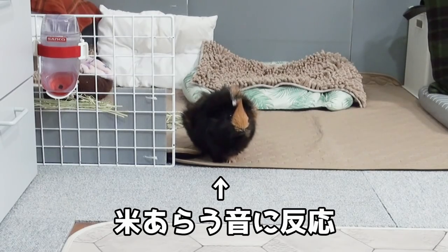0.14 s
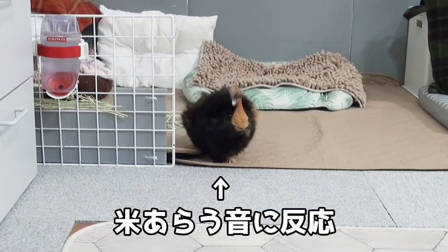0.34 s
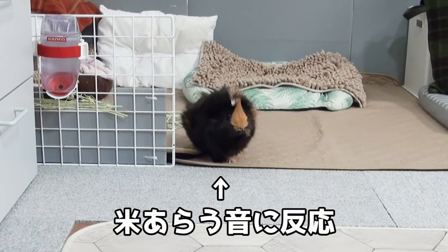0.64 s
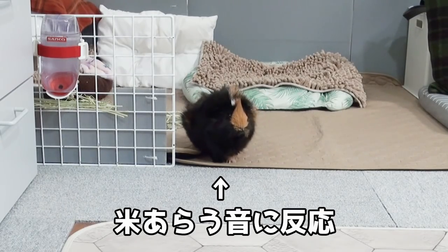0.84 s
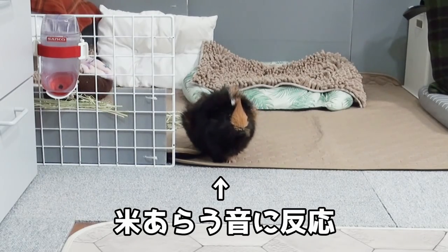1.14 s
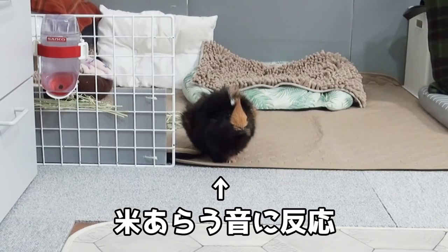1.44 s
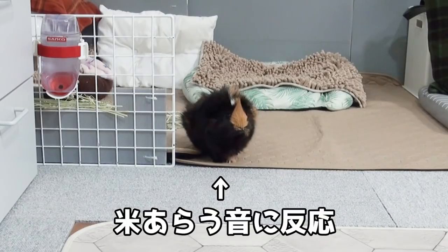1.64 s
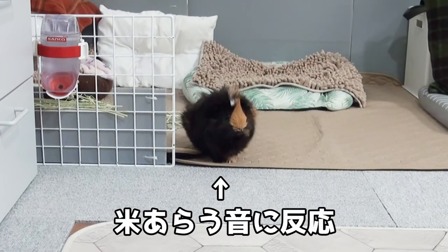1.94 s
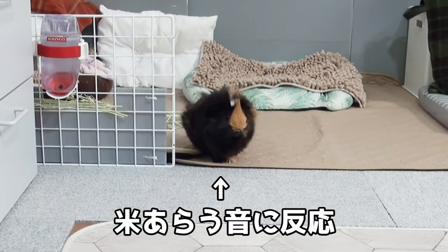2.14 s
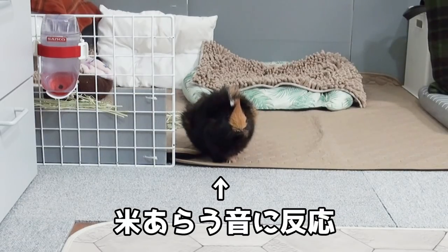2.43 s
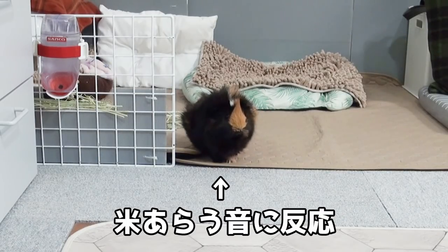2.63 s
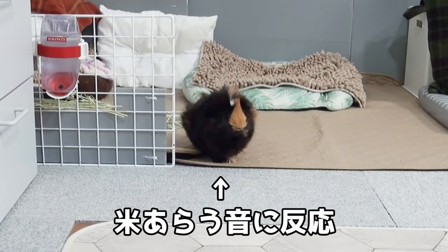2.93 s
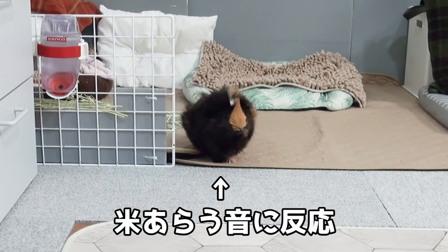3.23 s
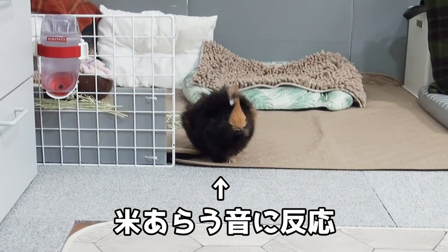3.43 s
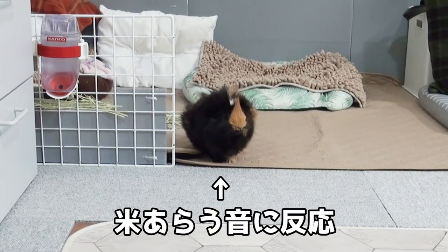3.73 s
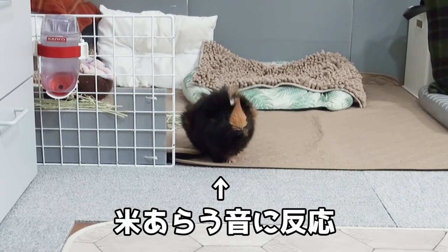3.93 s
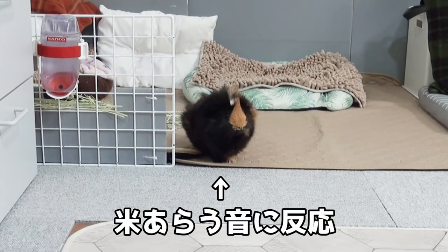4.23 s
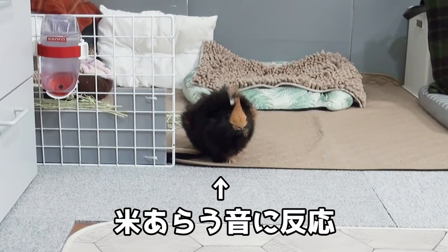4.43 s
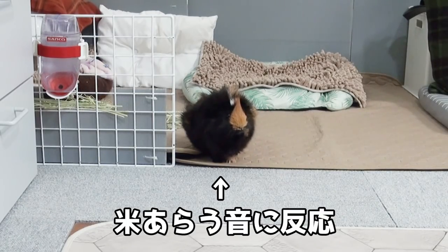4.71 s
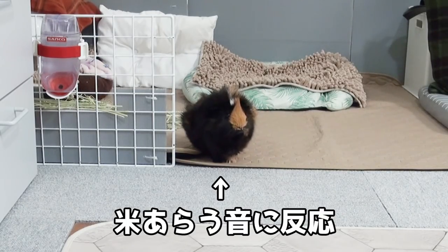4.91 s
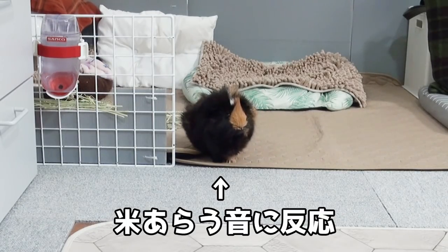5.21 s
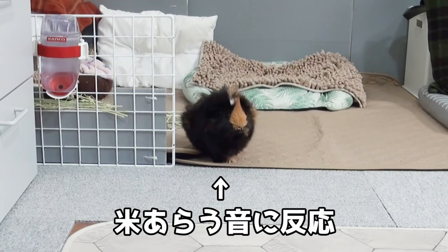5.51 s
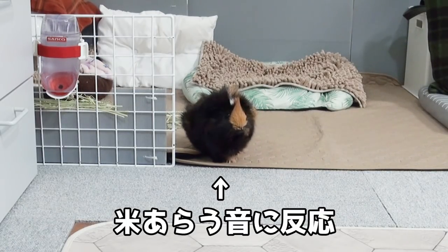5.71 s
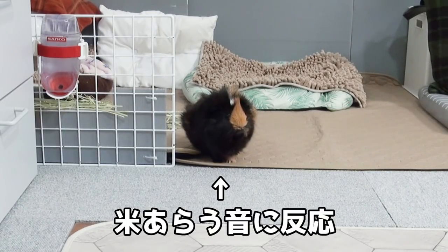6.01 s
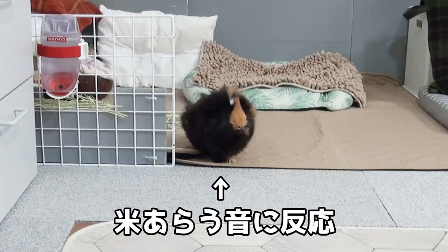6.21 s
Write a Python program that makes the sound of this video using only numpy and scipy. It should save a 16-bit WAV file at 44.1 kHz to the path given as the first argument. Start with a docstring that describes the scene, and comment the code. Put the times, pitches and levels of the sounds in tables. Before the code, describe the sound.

A hand swishes wet rice round a metal bowl about three strokes a second, grains rattling brightly while water gulps and bubbles between strokes.

```python
"""Washing rice in a metal bowl

A hand swirls rice in water, about three strokes a second, heard from across a kitchen.
Random ticks make the rattling grains, and short decaying tones make the bubbles.
Wavering, gliding tones make air pockets gulp and gurgle; filtered noise makes the low water.
The metal bowl rings and the room adds a short tail.
Two wavering low tones make a faint, fuzzy resonance stirred by the hand.
"""
import sys
import numpy as np
from scipy import signal
from scipy.fft import rfft, irfft
from scipy.io import wavfile
from scipy.ndimage import uniform_filter1d

SR = 44100
rng = np.random.default_rng(int(sys.argv[2]) if len(sys.argv) > 2 else 0)


def file_out(sig):
    """Save sig as 16-bit WAV at sys.argv[1]."""
    # one column per channel
    cols = np.atleast_2d(sig).T
    # limit, then scale
    lim = np.clip(cols, -1, 1)
    pcm = np.round(lim * 32767).astype(np.int16)
    wavfile.write(sys.argv[1], SR, pcm)


N = 280476
TIME = np.arange(N) / SR  # seconds
HZ = np.fft.rfftfreq(N, 1 / SR)

# Levels in the tables are starting points: the functions may trim them, and the bowl colours them.
# Colour tables only set the balance between pitches.

# Strokes of the hand, each lasting until the next starts: start_s, speeding_up_s, slowing_down_s,
# fade_across_db, rattle_level_db, wet_crunch_level_db, metal_scratch_level_db
HAND_STROKES = [(-0.027, 0.055, 0.13, 2.5, -36.5, -46.5, -43.5), (0.199, 0.13, 0.14, -7, -34, -45.5, -41),
                (0.528, 0.064, 0.14, -4.5, -37, -45, -45), (0.849, 0.062, 0.3, -12.5, -34.5, -38.5, -43),
                (1.201, 0.056, 0.1, -0.5, -37, -43, -48), (1.5, 0.073, 0.35, -9.5, -32.5, -36.5, -38),
                (1.824, 0.11, 0.033, 11.5, -34.5, -39.5, -41.5), (2.155, 0.16, 0.41, 5, -31, -31, -32.5),
                (2.518, 0.089, 0.049, 7, -38.5, -39.5, -44.5), (2.833, 0.1, 0.2, -1, -32.5, -36, -37.5),
                (3.17, 0.077, 0.24, -12.5, -34, -39.0, -39), (3.49, 0.095, 0.29, -4, -33.5, -34.5, -38.5),
                (3.861, 0.07, 0.32, -15, -36.5, -37, -40), (4.193, 0.062, 0.34, -4, -31.5, -33, -37),
                (4.502, 0.096, 0.28, 12, -35.5, -40, -39), (4.897, 0.25, 0.22, 24, -31.5, -32.5, -35.5),
                (5.188, 0.048, 0.23, -7.5, -34.5, -41, -40.5),
                (5.513, 0.044, 0.041, 17.5, -38.5, -43, -48.5), (5.808, 0.12, 0.31, -15, -29.5, -29.5, -37),
                (6.063, 0.097, 0.21, -25.5, -34.5, -37, -44)]
# Brief surges and dips in the grain sound: middle_s, half_length_s, rattle_lift_db, crunch_lift_db
GRAIN_SURGES = [(.53,0.02,2.5,2),(0.922,0.0064,4,-2),(0.96,0.021,2,-3),(1.196,.015,-0.5,2),(1.25,0.025,3,0),(1.276,0.007,-1.5,6),(1.315,0.016,-6.5,-2),(1.412,0.013,-9,3.5),(1.445,0.0067,-3,-5),(1.695,0.023,1,3.5),(1.804,0.011,0,-8),(2.041,0.012,-0.5,5),(2.203,0.029,-4,4),(2.283,0.03,4.5,-2),(2.372,0.025,1,6.5),(2.47,0.016,4.5,-2),(2.518,0.024,-3.5,-6),(2.66,0.01,1,-3),(2.71,0.012,-8,2),(2.803,0.016,9.5,2.5),(2.96,0.0092,3.5,2),(2.985,0.011,-1.5,-3.5),(3.067,0.017,3.5,5.5),(3.202,0.015,-2,3.5),(3.265,0.007,1,5),(3.387,0.017,1.5,9),(3.48,0.011,2.5,-8),(3.825,0.018,4,-7),(3.607,0.046,4,-0.5),(3.723,0.02,-2.5,4),(3.957,0.02,6.5,2.5),(4.07,0.018,2.5,5.5),(4.122,0.032,4,-1.5),(4.39,0.018,4.5,4.5),(4.569,0.0089,-4,5.5),(4.692,0.038,1,7.5),(4.796,0.016,6.5,4.5),(5.016,0.014,-0.5,3.5),(5.069,0.0084,-7,2.5),(5.236,.006,-3,9),(5.267,0.0044,1,5),(5.356,0.023,4.5,7.5),(5.455,0.0082,3,5.5),(5.695,0.0083,5.5,2.5),(6.058,.02,2,-1.5),(6.345,.02,-1,0)]
# Clumps of rice that break loose all at once: start_s, level_db, decay_s
BREAKING_CLUMPS = [(0.909, -39, 0.007), (1.036, -32, .008), (1.346, -46, 0.011), (1.559, -37, .012),
                   (1.87, -34, .012), (2.207, -31, 0.014), (2.563, -38, .02), (3.246, -33, 0.01),
                   (3.544, -32.5, .012), (3.931, -33, 0.011), (4.038, -32, .006), (4.229, -34, .012),
                   (4.265, -31, .006), (5.538, -36, .015), (6.16, -41, .012)]
# Colour of the rattling grains: pitch_hz, level_db_per_hz
RATTLE_COLOUR = [(300, -85), (900, -56), (2000, -19), (3200, -11.5), (4000, -1.5), (5000, 2), (6300, -3.5),
                 (7300, -2.5), (8000, -11.5), (9000, -17), (11000, -56), (14000, -75)]
# Colour of the wet crunch: pitch_hz, level_db_per_hz
CRUNCH_COLOUR = [(200, -87), (700, -50), (1100, -34.5), (1450, -11), (1700, -9), (2100, -6.5), (2350, -1.5),
                 (2650, -0.5), (3100, -1.5), (3800, -3.5), (5000, -10.5), (9000, -45), (14000, -85)]
# Colour of the scratch on the metal: pitch_hz, level_db_per_hz
SCRATCH_COLOUR = [(1000, -80), (4500, -33), (6300, 2), (7300, 0.5), (7900, -0.5), (8700, -0.5),
                  (9500, -10.5), (10300, -12), (11000, -31), (12500, -37), (15000, -81)]
# Colour of a breaking clump: pitch_hz, level_db_per_hz
CLUMP_COLOUR = [(300, -48), (1000, -19), (1800, -3), (2600, 1), (5000, 5), (7300, -10), (9000, -18),
                (11000, -44), (15000, -65)]
# Swarms of bubbles in the wake of the hand: middle_s, half_length_s, level_db, pitch_hz, scatter_octaves
BUBBLE_SWARMS = [(0.182,0.11,-54,1216,0.51),(0.434,0.11,-50,1252,0.47),(0.766,0.047,-46.5,1350,0.57),(0.913,0.038,-46.5,1250,0.42),(1.064,0.07,-42.5,1136,0.71),(1.277,0.052,-48.5,1360,0.44),(1.378,0.057,-42.5,1184,0.33),(1.537,0.036,-43.5,1230,0.49),(1.702,0.066,-44.5,1350,0.65),(2.025,0.056,-45.5,1374,0.39),(2.218,0.09,-43.5,1440,0.35),(2.392,0.041,-42.5,1415,0.62),(2.617,0.07,-43.5,1477,0.41),(2.754,0.054,-54,1370,0.79),(3.055,0.065,-45.5,1380,0.35),(3.29,0.079,-45,1455,0.35),(3.583,0.061,-55,1440,0.31),(3.75,0.05,-59,1450,0.29),(4.02,0.18,-55,1494,0.22),(4.23,0.052,-49,1377,0.23),(4.357,0.044,-48.5,1540,0.31),(4.514,0.062,-48.5,1377,0.37),(4.61,0.028,-55,1360,0.26),(4.707,0.033,-58,1410,0.294),(5.04,0.03,-63,1470,0.51),(5.226,0.021,-52,1466,0.47),(5.395,0.024,-56,1244,0.22),(5.483,0.01,-47.5,1150,0.38),(5.544,0.031,-44.5,1296,0.57),(5.815,0.05,-45.5,1232,.36),(6.157,0.045,-48,1360,0.47)]
# Small bubbles give off little bass: pitch_hz, level_db
SWARM_COLOUR = [(200, -28), (600, -4), (1000, -1), (1600, -1.5), (4000, 27)]
# Waves that cross the bowl: middle_s, half_length_s, rocking_level_db, rumble_level_db
BOWL_WAVES = [(0.054,0.066,-47,-86),(0.192,0.035,-48.5,-80),(0.443,0.071,-55.5,-75),(0.795,0.053,-44.5,-73),(1.073,0.049,-51,-84),(1.176,0.017,-57,-77),(1.42,.048,-50,-75),(1.71,0.053,-51,-88),(1.98,0.028,-53.5,-82),(2.105,0.052,-49.5,-82),(2.28,0.054,-54,-92),(2.45,0.015,-58,-99),(2.55,0.08,-55,-96),(2.673,0.053,-59,-75),(2.768,0.058,-50.5,-80),(3.208,0.05,-52,-74),(3.36,0.041,-59,-81),(3.47,0.028,-57.5,-84),(3.781,0.035,-55,-79),(3.878,0.03,-50,-77),(4,0.058,-54.5,-83),(4.13,0.03,-57,-91),(4.365,0.079,-59,-87),(4.47,0.028,-56,-77),(4.586,0.031,-63,-93),(4.795,0.018,-64.5,-87),(5.058,0.033,-58.5,-74),(5.16,0.11,-66,-98),(5.627,0.078,-63,-79),(5.782,0.026,-52.5,-75),(6.276,0.062,-53,-89)]
# Level of the water under the waves: time_s, rocking_level_db, rumble_level_db
WATER_FLOOR = [(0,-69,-75),(.6,-82,-80.5),(1,-69,-89),(2,-72,-82),(2.8,-72,-95),(3.03,-91,-99),(3.2,-76,-85),(3.67,-80,-92),(3.9,-73,-100),(4.5,-62.5,-88),(4.87,-99,-102),(5.05,-76,-92),(5.4,-92,-88),(5.6,-78,-88),(6.36,-69,-82)]
# Colour of the rocking water: pitch_hz, level_db_per_hz
ROCKING_COLOUR = [(250, -29), (400, -19), (470, -8.5), (530, -5), (620, 8.5), (740, 2.5), (860, -5.5),
                  (1200, -3.5), (2500, -62), (9000, -80)]
# Colour of the dull rumble of the water: pitch_hz, level_db_per_hz
RUMBLE_COLOUR = [(20, -6), (80, -7), (130, 0), (200, 2), (300, 3.5), (420, -1), (600, -16), (1500, -45),
                 (9000, -80)]
# Air pockets: middle_s, lowest_pitch_hz, half_length_s, level_db
AIR_POCKETS = [(0.058, 671, 0.02, -37.5), (0.105, 1036, 0.0061, -42), (0.18, 680, 0.021, -44.5),
               (0.675, 437, 0.012, -55), (0.798, 547, 0.022, -39), (0.905, 1220, .01, -41.5),
               (1.002, 1048, .007, -45), (1.091, 745, 0.019, -41), (1.132, 1021, .008, -45),
               (1.545, 1045, 0.008, -41), (1.683, 734, 0.018, -38), (1.722, 1220, .008, -48),
               (2.083, 565, 0.014, -42), (2.399, 1216, .009, -48), (2.534, 522, 0.012, -43.5),
               (2.554, 1410, 0.0092, -46), (2.664, 573, 0.019, -41.5), (2.893, 1345, 0.0085, -49),
               (3.129, 513, 0.014, -55.5), (3.236, 513, 0.017, -44.5), (3.321, 1382, 0.0084, -46),
               (3.478, 587, .007, -54), (3.595, 1332, .008, -47.5), (3.858, 520, 0.023, -45.5),
               (4.014, 664, 0.013, -48), (4.114, 669, 0.0094, -51.5), (4.224, 1350, 0.016, -46.5),
               (4.343, 1460, 0.008, -42.5), (4.389, 1446, 0.006, -43.5), (4.35, 591, .009, -50.5),
               (4.38, 671, .007, -51), (3.778, 683, 0.0084, -51), (4.172, 1092, .005, -53.5),
               (4.273, 662, .005, -54.5), (4.436, 521, .011, -48), (4.463, 530, 0.011, -40),
               (4.569, 1430, 0.0067, -50), (4.969, 530, 0.008, -48), (5.036, 542, 0.009, -46),
               (5.056, 525, 0.008, -44), (5.077, 559, 0.007, -46), (5.055, 1470, .009, -47),
               (5.208, 528, 0.011, -58), (5.4, 1050, 0.011, -55), (5.543, 1046, .007, -45),
               (5.646, 533, 0.009, -52), (5.146, 1220, 0.0069, -55), (5.976, 652, 0.011, -57.5),
               (5.682, 580, .009, -49.5), (5.74, 1200, .009, -47.5), (5.858, 1500, .011, -44),
               (6.178, 515, 0.011, -53.5), (6.258, 579, 0.012, -43.5), (6.292, 580, .009, -45.5),
               (6.32, 1048, .009, -53)]
# Colour of the water collapsing round a pocket: pitch_hz, level_db_per_hz
COLLAPSE_COLOUR = [(50, -16), (150, -11), (300, 6), (380, 12.5), (440, 16), (550, -4), (800, -8),
                   (2000, -40)]
# Chains of bubbles as water drains or fills a hollow:
# middle_s, half_length_s, pitch_hz, glide_octaves_per_s, level_db
BUBBLE_CHAINS = [(0.089, .017, 764.4, 8.5, -38.5), (0.221, 0.017, 763, 13.5, -47),
                 (0.768, 0.023, 640, -6, -47), (0.86, 0.018, 763, 10, -48), (.935, 0.0084, 1000, -8.5, -49),
                 (.972, 0.011, 870, -3, -48), (1.125, 0.022, 830, 7, -53), (1.254, 0.025, 1368, 4, -51),
                 (1.422, .016, 640, 1, -47.5), (1.58, 0.014, 1320, 7, -51), (1.629, .016, 950, -12, -49.5),
                 (1.746, .012, 940, 5, -47.5), (1.804, 0.013, 1030, 2.5, -54),
                 (2.122, 0.016, 627, 8.5, -42), (2.262, .016, 1285, -5.5, -45),
                 (2.495, .016, 1263, 7.5, -50), (3.259, 0.013, 588, 2.5, -54),
                 (3.896, 0.013, 700, 13.5, -51), (4.363, .02, 654, 7, -51), (4.485, .011, 709, 27.5, -48.5),
                 (4.507, .009, 1289, 20, -47), (4.602, 0.019, 622, 4.5, -67)]
# The hand shoves water against the wall of the bowl: start_s, level_db, decay_s
WATER_SHOVES = [(1.915, -59.5, 0.024), (3.129, -57, 0.052), (4.935, -58.5, 0.031), (5.541, -50.5, 0.045),
                (6.14, -55.5, 0.091)]
# Colour of a shove: pitch_hz, level_db_per_hz
SHOVE_COLOUR = [(40, -22), (110, -11), (220, -16), (262, 7), (310, -26), (450, -6.5), (700, -3),
                (1500, -19), (4000, -50)]
# Bursts of fine bright spray: middle_s, half_length_s, level_db
SPRAY_BURSTS = [(0.087, 0.074, -52), (0.433, 0.078, -50), (2.3, 0.032, -50), (2.37, 0.025, -58),
                (3.32, 0.016, -56), (3.673, 0.042, -54.5), (4.31, .012, -56), (4.64, 0.027, -49.5),
                (4.99, 0.044, -54), (1.695, 0.02, -60)]
# Colour of the spray: pitch_hz, level_db_per_hz
SPRAY_COLOUR = [(1000, -70), (4000, -29), (8000, 17), (10500, 9), (12000, 3), (14500, -16), (16000, -12)]
# Resonances of the bowl; a negative lift is a dip: pitch_hz, width_hz, lift_db
BOWL_MODES = [(620, 115, -4), (741, 17, 2), (1065, 34, 3.5), (1216, 18, 3.5), (1290, 44, -6),
              (1336, 36, 2.5), (1472, 36, 4), (1640, 38, -3), (2307, 24, 3.5), (2357, 25, 2.5),
              (2557, 29, 1.5), (2583, 22, 2.5), (2680, 43, 1.5), (2934, 26, 1), (3100, 40, -2.5),
              (3310, 34, 2), (3570, 37, 2), (3780, 45, 2), (3950, 35, 3.5), (4170, 39, 3), (4770, 51, 2),
              (5420, 45, -0.5), (5830, 40, 2), (5950, 165, 5), (7100, 43, 7), (7260, 29, 5.5),
              (7400, 30, 5), (7439, 40, 3.5), (8290, 50, 3), (8400, 51, 2)]
# Low tones of a fuzzy resonance stirred by the hand: pitch_hz, level_db
LOW_TONES = [(138, -13.5), (240, -2.5)]
# Strength of the low tones over time: time_s, level_db
LOW_TONE_STRENGTH = [(0, -68), (.6, -72.5), (1.0, -78.5), (1.9, -76.5), (2.3, -83.5), (4.4, -82),
                     (5.1, -92), (5.6, -77), (6.36, -78)]
# How fast the tail of the kitchen fades: pitch_hz, time_to_fall_60_db_s
KITCHEN_FADE = [(200, 0.14), (1000, 0.27), (4000, 0.056), (12000, 0.08)]
# Colour of the low rumble of the kitchen: pitch_hz, level_db_per_hz
AIR_COLOUR = [(20, -6), (60, -7), (130, -3), (240, 2), (400, -6), (1000, -25), (4000, -45)]
# Balance between the two ears: pitch_hz, left_minus_right_db
EAR_BALANCE = [(60, -2), (130, -6.5), (260, -10), (450, -1), (700, -2), (1150, 5.5), (2000, 6.5), (3300, 7),
               (5300, 6.5), (7500, 0.5), (9500, -2), (15000, 1)]
# Likeness that guides how much the two ears share: pitch_hz, likeness_0_to_1
EAR_LIKENESS = [(60, 0.87), (250, 0.8), (600, 0.92), (1200, 0.82), (2500, 0.89), (5000, 0.94), (9000, 0.9),
                (14000, 0.44)]
# Left-right balance of the grain sound over time, before scaling and centring:
# time_s, left_minus_right_db
GRAIN_BALANCE = [(0.0, 2.5), (0.53, 1.5), (0.56, 5.5), (2.53, 2.5), (2.55, 4.5), (3.13, 2.5), (3.19, 8),
                 (3.28, 2.5), (3.93, 5.5), (3.97, 2), (5.12, 4), (5.19, 9.5), (5.28, 2.5), (5.63, 4),
                 (5.83, 10), (5.91, 1.5), (6.11, 7.5), (6.36, 4)]

LAST_END_S = 6.344  # end of the last stroke
# How far each sound sinks while the hand turns round
RATTLE_DIP_DB, CRUNCH_DIP_DB, SCRATCH_DIP_DB = 12, 23, 16
SCRATCH_LAG_S = 0.021  # the grains reach the wall after the hand moves
SLIP_DB = 0.86  # how much the grains catch and slip
SETTLING_DB = -53  # loose grains that settle build up to this, before the crunch lifts
SIMMER_DB = -61  # stray bubbles between the swarms, before the trim
RUMBLE_STRETCH = 1.43  # the rumble of a wave outlasts its rocking
AIR_DB = -90.5
BALANCE_SHARE = 0.68  # part of the grain balance that is used
EDGE_HZ = 15500


def rice():
    """Grains tick in clumps that catch and slip, with tiny bubbles between them."""
    rattle_db, crunch_db, scratch_db = np.transpose(HAND_STROKES)[-3:]
    rattle_surge_db, crunch_surge_db = sum(
        np.outer(lifts_db, bell(s, half)) for s, half, *lifts_db in GRAIN_SURGES)
    slip = gain_of(SLIP_DB * wander(rate_hz=49))

    ticks = patchy(rebounds(clicks(per_s=6000, spread_db=1.56)), patchy_db=1.88)
    prickles = bubbles(np.full(N, 5600.), per_s=760, scatter=0.799, cycles=18.8, spread_db=0.5, rise=0.0089)
    rattle = colour(ticks + gain_of(-12) * prickles, RATTLE_COLOUR)
    rattle *= stroking(rattle_db, RATTLE_DIP_DB) * gain_of(rattle_surge_db - 1.54)

    wet_ticks = rebounds(clicks(per_s=3800, spread_db=1.4))
    pops = bubbles(np.full(N, 3000.), per_s=250, scatter=1.3, cycles=15.0, spread_db=1.5, rise=0.014)
    crunch = colour(wet_ticks + gain_of(-13) * pops, CRUNCH_COLOUR)
    settling = gain_of(SETTLING_DB) * TIME / TIME[-1]
    crunch *= np.hypot(stroking(crunch_db, CRUNCH_DIP_DB), settling)
    crunch *= gain_of(crunch_surge_db + 0.47 * wander(rate_hz=66) - 0.48)

    scratch = colour(clicks(per_s=7800, spread_db=1.5), SCRATCH_COLOUR)
    scratch *= stroking(scratch_db, SCRATCH_DIP_DB, SCRATCH_LAG_S)
    scratch *= gain_of(0.36 * rattle_surge_db + 2.05 * wander(rate_hz=30) + 1.52)
    return slip * (rattle + crunch + scratch) + crunches()


def crunches():
    """A clump gives way with a sudden burst of ticks that dies away."""
    ticks = rebounds(clicks(per_s=3000, spread_db=1.5))
    return bursts(BREAKING_CLUMPS, rise_s=0.0015) * colour(ticks, CLUMP_COLOUR)


def stroking(levels_db, dip_db, lag_s=0):
    """The gain of the strokes: the hand speeds up, sweeps on and slows into the next turn."""
    starts, rises, falls, fades = np.transpose(HAND_STROKES)[:4]
    ends = np.append(starts[1:], LAST_END_S)
    t, power = TIME - lag_s, 0
    for start, end, rise, fall, fade_db, db in zip(starts, ends, rises, falls, fades, levels_db):
        speeding_up = np.maximum(1 - (t - start) / rise, 0) ** 2
        slowing_down = np.maximum(1 - (end - t) / fall, 0) ** 2
        along = np.clip((t - start) / (end - start), 0, 1) - .5
        stroke_db = db - dip_db * (speeding_up + slowing_down) - fade_db * along
        power = power + gain_of(np.maximum(stroke_db, -120)) ** 2
    return np.sqrt(power)


def water():
    """Bubbles ring in the wake of the hand, over the low rocking and rumble of the water."""
    pitch_hz, scatter = follow(BUBBLE_SWARMS)[-2:]
    wake = bubbles(pitch_hz, per_s=330, scatter=scatter, cycles=9.0, spread_db=2.0, rise=0.014)
    wake = colour(wake, SWARM_COLOUR) * swells(*np.transpose(BUBBLE_SWARMS)[:3], SIMMER_DB) * gain_of(-2.5)

    middles, halves, rocking_db, rumble_db = np.transpose(BOWL_WAVES)
    calm_rocking_db, calm_rumble_db = follow(WATER_FLOOR)
    rocking = colour(clicks(per_s=700, spread_db=2.5), ROCKING_COLOUR)
    rocking *= swells(middles, halves, rocking_db, calm_rocking_db)
    rumble = colour(rng.standard_normal(N), RUMBLE_COLOUR)
    rumble *= swells(middles, RUMBLE_STRETCH * halves, rumble_db, calm_rumble_db)
    return wake + rocking + rumble * gain_of(3.5 + 3.5 * wander(rate_hz=19))


def gulps(bend=.07, rough=0.49, flutter_hz=60, body_db=-17):
    """An air pocket opens and shuts: its pitch sinks and climbs again while the surface flutters."""
    out = np.zeros(N)
    flutter = fluttering(rough, flutter_hz)
    body = gain_of(body_db) * colour(rng.standard_normal(N), COLLAPSE_COLOUR)
    for s, lowest_hz, half, db in AIR_POCKETS:
        near = abs(TIME - s) < 3 * half
        u = (TIME[near] - s) / half
        swell = np.exp(-u ** 2 / 2 * (1 + (u / 2) ** 2))
        pitch_hz = lowest_hz * (1 + bend * (np.hypot(1, 2 * u) - 1))
        tone = wavering_tone(swell, pitch_hz, flutter[near])
        size = (520 / lowest_hz) ** 3  # volume of the pocket: deep ones are bigger
        out[near] += gain_of(db) * (tone / 2 + size * swell * body[near])
    return out


def gurgles(rough=0.99, flutter_hz=62, throb_db=3):
    """Bubbles in quick succession are heard as one trembling, gliding note."""
    out = np.zeros(N)
    flutter = fluttering(rough, flutter_hz) * gain_of(throb_db * wander(rate_hz=140))
    for s, half, hz, glide, db in BUBBLE_CHAINS:
        near = abs(TIME - s) < 3 * half
        t = TIME[near] - s
        swell = np.exp(-(t / half) ** 2 / 2)
        out[near] += gain_of(db) / 2 * wavering_tone(swell, hz * 2 ** (glide * t), flutter[near])
    return out


def shoves():
    """Dull thuds of water, each a quick swell and a slower fall of dark noise."""
    return bursts(WATER_SHOVES, rise_s=0.0068) * colour(rng.standard_normal(N), SHOVE_COLOUR)


def spray():
    """A mist of droplets sounds as bright random ticks in short swells."""
    swell = sum(gain_of(db) * bell(s, half) for s, half, db in SPRAY_BURSTS)
    return gain_of(7.5) * swell * colour(clicks(per_s=4400, spread_db=3.5), SPRAY_COLOUR)


def bowl(x):
    """The bowl's resonances lift or dip narrow bands, and the lifted ones ring on."""
    response = 1 + sum((gain_of(db) - 1) / (1 + 2j * (HZ - hz) / width) for hz, width, db in BOWL_MODES)
    return irfft(rfft(x) * response, N)


def low_resonance():
    """A faint, fuzzy low resonance stirred by the hand: low tones wavering in pitch and strength."""
    tones = 0
    for hz, db in LOW_TONES:
        tone = np.sin(2 * np.pi * hz * TIME + 0.45 * wander(rate_hz=13))
        tones = tones + gain_of(db) * evened(tone)
    return tones * gain_of(follow(LOW_TONE_STRENGTH)[0] + 3.5 * wander(rate_hz=10.5))


def air():
    """A faint, uneven rumble of low noise stays in the room."""
    return gain_of(AIR_DB + 3.3 * wander(rate_hz=12)) * colour(rng.standard_normal(N), AIR_COLOUR)


def reflections(x, build_s=0.0026):
    """The room's short tail builds up and dies away, each band at its own speed."""
    t = np.arange(SR // 3) / SR
    hz, at, z = signal.stft(rng.standard_normal(len(t)), SR, nperseg=256)
    fade = gain_of(-60 * at / read(KITCHEN_FADE, hz)[:, None])
    tail = signal.istft(z * fade, SR, nperseg=256)[1][:len(t)]
    tail = tail * (1 - np.exp(-t / build_s))
    return signal.oaconvolve(x, tail / np.linalg.norm(tail))[:N]


def clicks(per_s, spread_db):
    """Random tiny impacts, a few much larger than the rest."""
    when, size, sign = rng.random((int(per_s * N / SR), 3)).T
    height = gain_of(spread_db * np.minimum(-np.log(size), 4))
    return np.bincount((when * N).astype(int), height * np.sign(sign - .5), N)


def rebounds(x, ring_s=.0012, share=0.57):
    """Each tick bounces round inside the bowl and arrives as a short burst."""
    t = np.arange(SR // 100) / SR
    out = 0
    for k in range(6):  # six different bursts, shared out among the ticks
        burst = rng.standard_normal(len(t)) * np.exp(-t / ring_s)
        chosen = x * (np.arange(N) % 6 == k)
        out = out + signal.oaconvolve(chosen, burst / np.linalg.norm(burst))[:N]
    return evened((1 - share) * x + share * out)


def patchy(x, patchy_db):
    """Clumps of grains favour now one band, now another."""
    z = signal.stft(x, nperseg=256)[2]
    patches = uniform_filter1d(rng.standard_normal(z.shape), size=8, axis=0)
    patches = evened(uniform_filter1d(patches, size=7, axis=1))
    return signal.istft(z * gain_of(patchy_db * patches), nperseg=256)[1][:N]


def bubbles(pitch_hz, per_s, scatter, cycles, spread_db, rise):
    """Bubbles round a pitch curve: each rings for some cycles and rises as it nears the surface."""
    out, octaves = np.zeros(N), scatter * np.ones(N)
    for when, size, a, b in rng.random((int(per_s * N / SR), 4)):
        i = int(when * N)
        hz = pitch_hz[i] * 2 ** (octaves[i] * (a + b - 1))
        age = np.arange(int(5 * cycles * SR / hz)) * hz / SR / cycles  # 1 = one decay time
        swell = np.exp(-age) * (1 - np.exp(-10 * age))
        ring = np.sin(2 * np.pi * cycles * age * (1 + rise * age)) * swell
        add(out, when * N / SR, gain_of(spread_db * min(-np.log(size), 4)) * ring)
    return evened(out)


def fluttering(rough, flutter_hz):
    """Random wavering of strength and phase, as a complex gain."""
    return 1 + rough * (wander(flutter_hz) + 1j * wander(flutter_hz))


def wavering_tone(swell, pitch_hz, flutter):
    """A tone along a pitch curve, shaped by a swell and a flutter, at an rms of one."""
    turns = np.cumsum(pitch_hz) / SR
    return evened(swell * (flutter * np.exp(2j * np.pi * turns)).real)


def bursts(rows, rise_s):
    """The gain of sudden bursts: a quick rise and an exponential fall."""
    gain = np.zeros(N)
    for s, db, decay in rows:
        age = np.maximum(TIME - s, 0)
        gain += gain_of(db) * (1 - np.exp(-age / rise_s)) * np.exp(-age / decay)
    return gain


def bell(s, half):
    """A bell-shaped swell with a peak of one."""
    return np.exp(-((TIME - s) / half) ** 2 / 2)


def swells(middles, halves, levels_db, floor_db):
    """The gain of bell-shaped swells over a floor; their powers add."""
    bells = sum((gain_of(db) * bell(s, half)) ** 2 for s, half, db in zip(middles, halves, levels_db))
    return np.sqrt(bells + gain_of(floor_db) ** 2)


def wander(rate_hz):
    """Smooth chance, mostly slower than the given rate, at an rms of one."""
    return evened(irfft(rfft(rng.standard_normal(N)) * np.exp(-(HZ / rate_hz) ** 2), N))


def colour(x, points):
    """Filters x by a colour table and gives it an rms of one."""
    return evened(irfft(rfft(x) * gain_of(read(points, HZ)), N))


def read(points, hz):
    """Reads a table at any pitch, joining its points on a log-frequency axis."""
    f, value = np.transpose(points)
    return np.interp(np.log(hz + 1), np.log(f + 1), value)


def follow(rows):
    """The columns of a time table at every sample, joined by straight lines."""
    s, *columns = np.transpose(rows)
    return [np.interp(TIME, s, c) for c in columns]


def add(mix, s, sound):
    """Lays a sound into the mix at time s."""
    part = mix[max(round(s * SR), 0):][:len(sound)]
    part += sound[:len(part)]


def gain_of(db):
    """Decibels to amplitude."""
    return 10 ** (np.asarray(db) / 20)


def evened(x):
    """Scales to an rms of one."""
    return x / np.sqrt(np.mean(x ** 2) + 1e-20)


def scene():
    """The bowl stands off to the left; scattered grains and bubbles reach the two ears differently."""
    grains = bowl(rice())
    dry = grains + bowl(spray() + water() + gulps() + gurgles() + shoves())
    mid = gain_of(-0.73) * dry + gain_of(-13.0) * reflections(dry) + low_resonance() + air()

    # What differs between the ears: fresh grains, bubbles, room tail and rumble
    scattered = gain_of(-1.0) * bowl(rice() + gain_of(0.5) * water())
    scattered += gain_of(-8.5) * reflections(dry) + air()
    same = np.clip(read(EAR_LIKENESS, HZ), 0, 1)
    side = rfft(scattered) * np.sqrt((1 - same) / (1 + same))

    balance_db = follow(GRAIN_BALANCE)[0]
    balance_gain = gain_of(BALANCE_SHARE * (balance_db - balance_db.mean()) / 2)
    side += rfft(grains * (balance_gain - 1))

    lean = gain_of(read(EAR_BALANCE, HZ) / 2)
    left = (rfft(mid) + side) * lean
    right = (rfft(mid) - side) / lean
    return irfft(np.array([left, right]), N)


def record(dry):
    """Cuts off the treble above EDGE_HZ with a steep low-pass filter."""
    low_pass = signal.firwin(511, EDGE_HZ, window=("kaiser", 9), fs=SR)
    return signal.oaconvolve(dry, low_pass[None], "same")


dry = scene()
out = record(dry)
file_out(out)
```